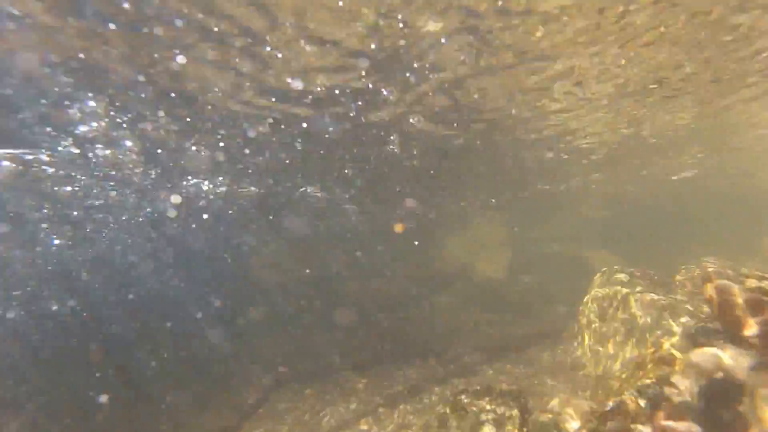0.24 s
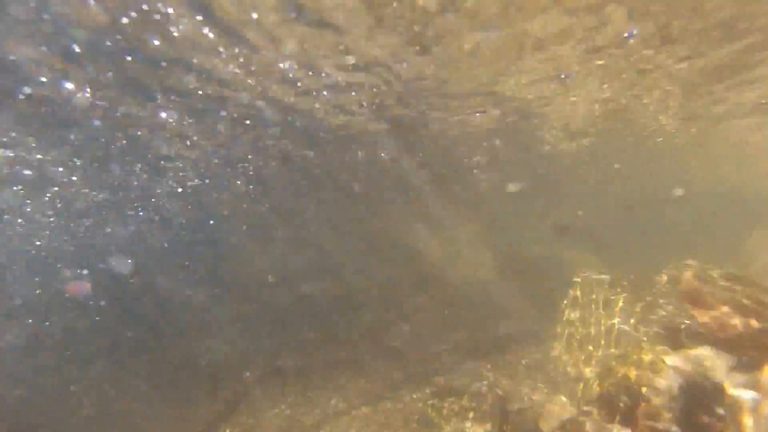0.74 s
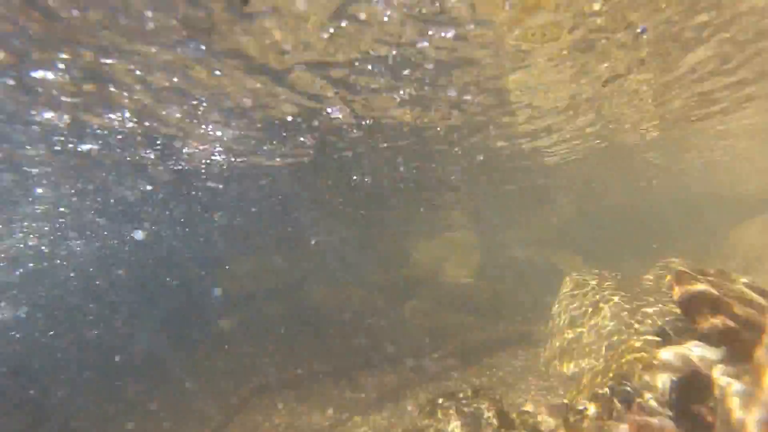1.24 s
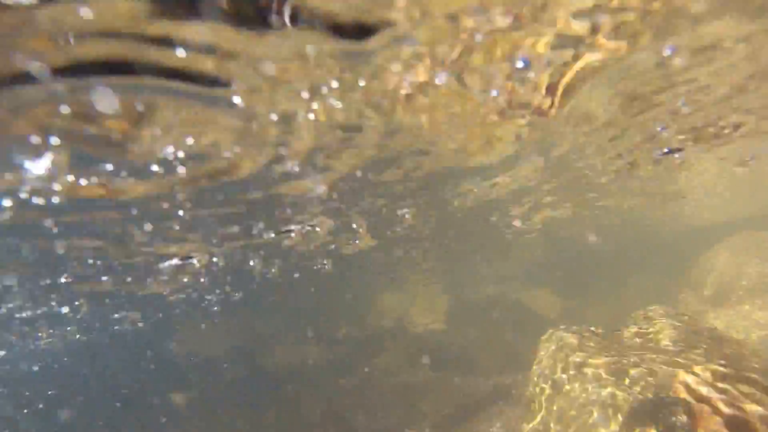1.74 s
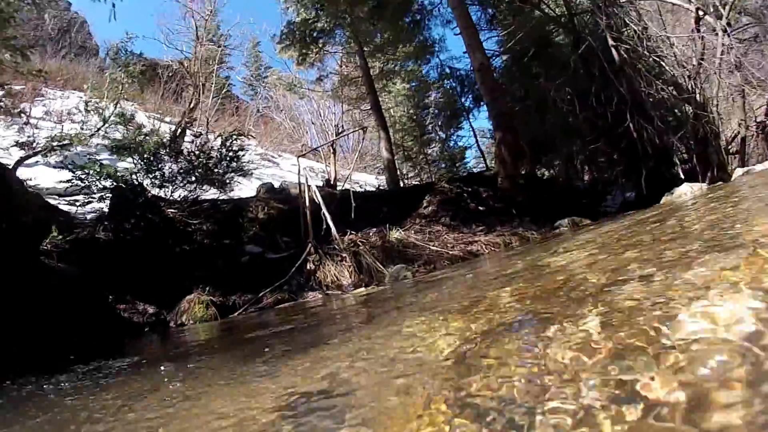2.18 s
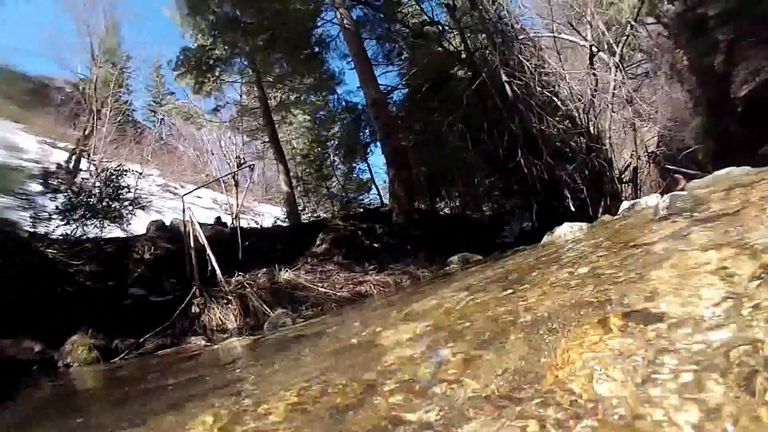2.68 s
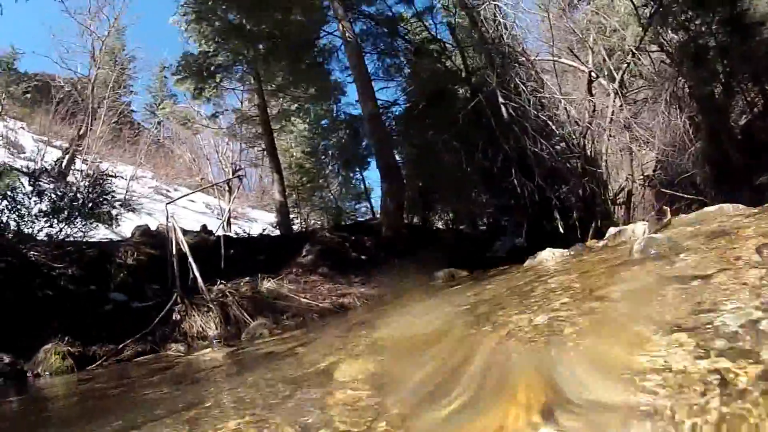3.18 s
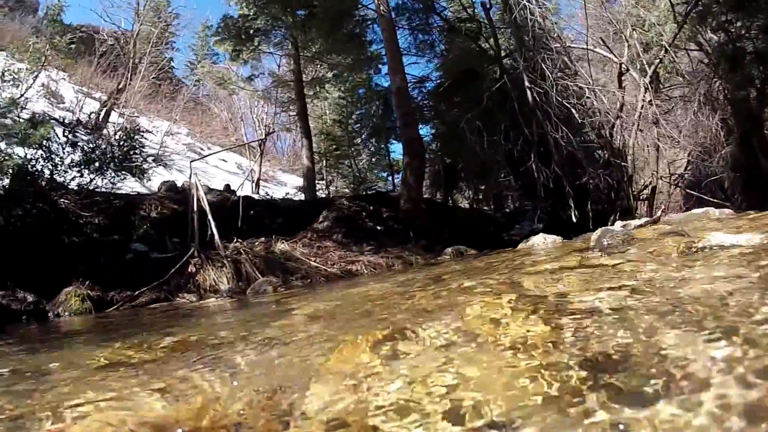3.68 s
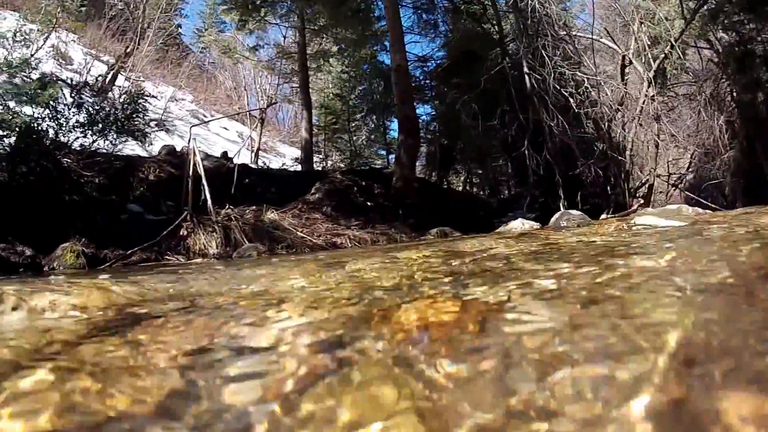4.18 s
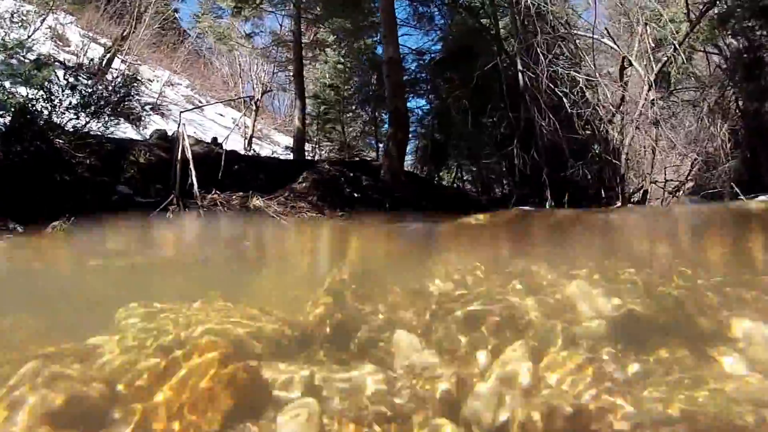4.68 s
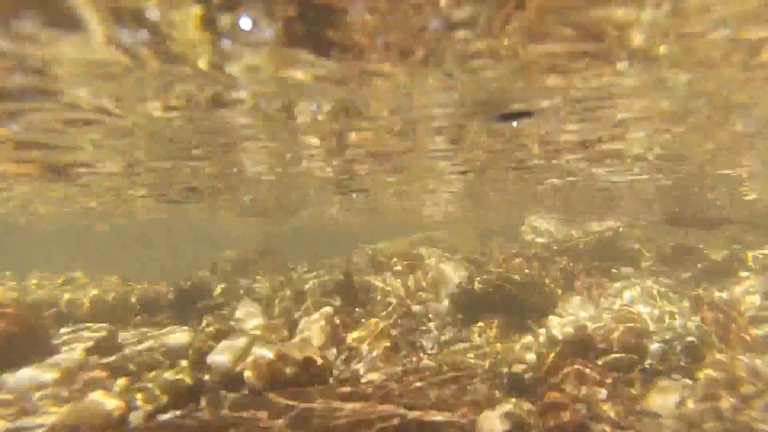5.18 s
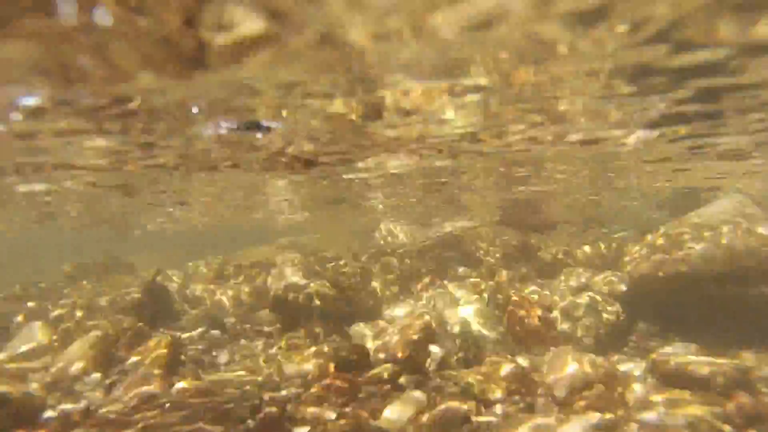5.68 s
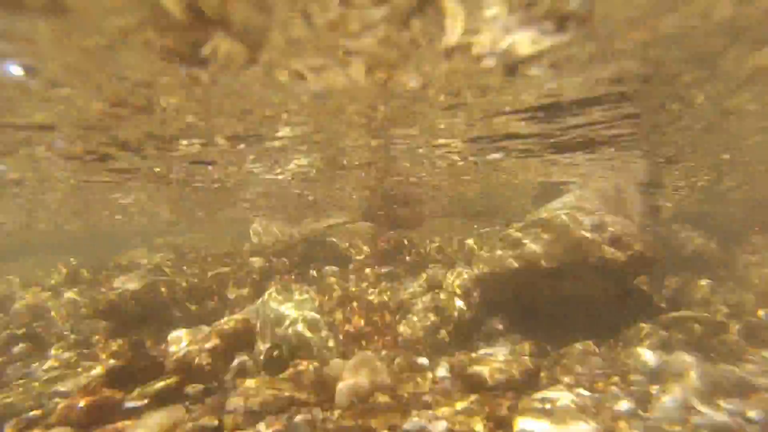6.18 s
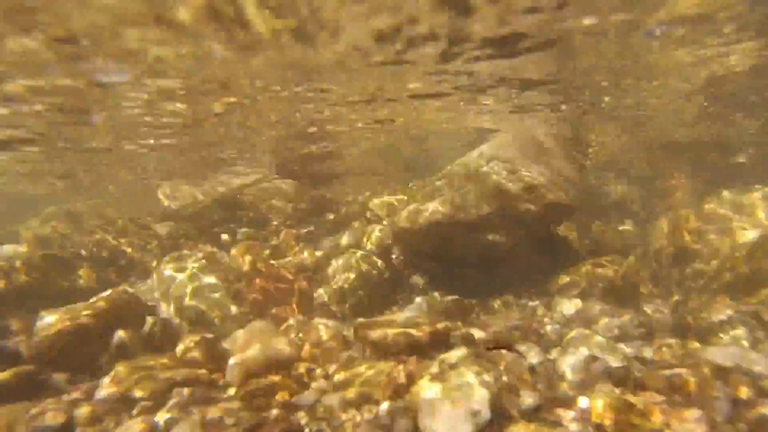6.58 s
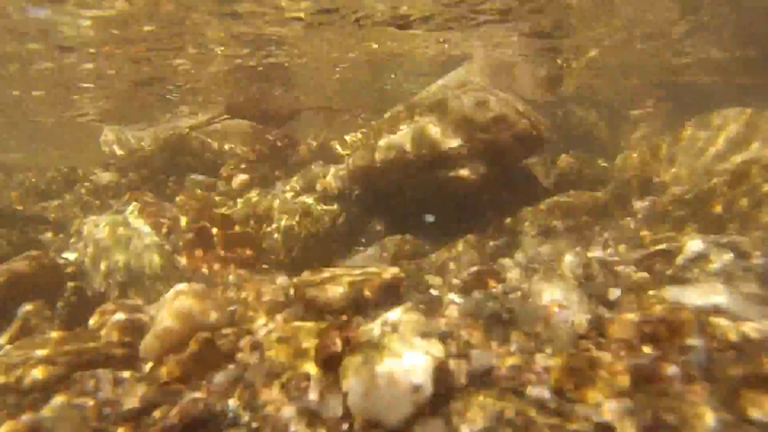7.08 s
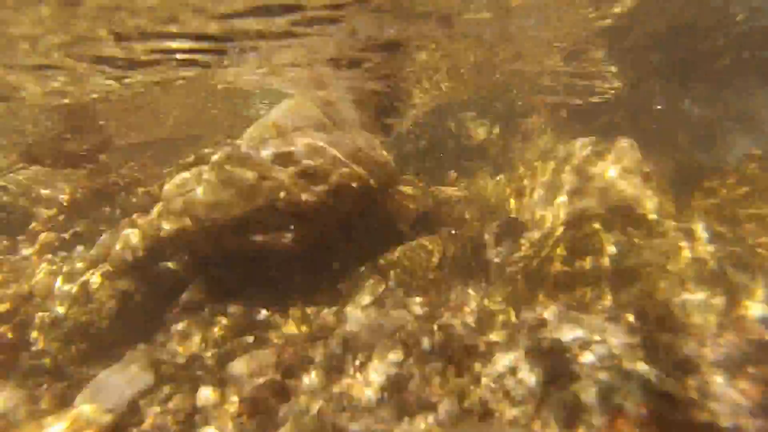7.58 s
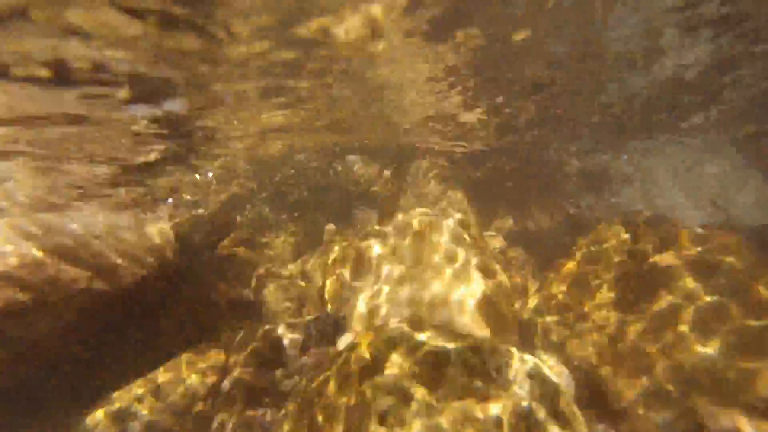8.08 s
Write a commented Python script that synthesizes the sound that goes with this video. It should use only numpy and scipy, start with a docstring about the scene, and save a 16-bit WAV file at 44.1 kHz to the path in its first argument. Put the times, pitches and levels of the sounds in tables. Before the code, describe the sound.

The microphone sits inside a watertight camera housing in a shallow stony stream, so everything is close, boxy and central. From 0 to 1.3 s there is muffled low rumble and gurgle, with soft knocks, a slightly stronger bump near 0.5 and faint gravel scrapes. Around 2 s the case surfaces and the babble turns thinner and brighter over faint hiss. At 2.94 a violent, distorted crack with hollow ringing and aftershocks ducks the background briefly. A sharp water slap comes at 3.8, with drips and tiny ticks until 4.5 as the case sinks and the water dulls. Hard knocks strike at 5.5 and rapidly from 5.7 to 5.8. From 6.3 to 7.2 it grinds and judders through gravel with irregular clacks, the loudest near 6.8. After a last small tick around 7.5, only muffled wash and low rumble continue to about 8.4.

```python
"""A watertight housing with a microphone inside knocks on stones and drags through gravel in a shallow stream.
Blows ring its walls and hollow body as damped modes; drags, pebbles and sand are random contacts.
Water slaps, drops, bubbles and sand grains ring briefly; the housing is largely out of the water from 2 to 4.6 s.
The stream is coloured noise and bubble tones over a rumble: muffled under water, brighter in the air.
A limiter ducks after the hardest knocks, which still clip."""
import sys
import numpy as np
from scipy import signal
from scipy.fft import rfft, irfft, next_fast_len
from scipy.io import wavfile
from scipy.ndimage import uniform_filter1d, map_coordinates

SR = 44100
rng = np.random.default_rng(int(sys.argv[2]) if len(sys.argv) > 2 else 0)


def int16_out(signal):
    """Quantize to a 16-bit WAV file."""
    q = np.round(np.clip(np.atleast_2d(signal).T, -1, 1) * 32767)
    wavfile.write(sys.argv[1], SR, q.astype(np.int16))


N = 368101


def amp(db):
    """Gain of a level in dB."""
    return 10 ** (np.asarray(db) / 20)


def unit(x):
    """x at rms 1."""
    return x / np.sqrt(np.mean(x ** 2) + 1e-20)


def curves(rows):
    """One value per sample for each column after the time."""
    time_s, *columns = np.transpose(rows)
    return [np.interp(np.arange(N) / SR, time_s, column) for column in columns]


def wobble(rate_hz):
    """A smooth random curve with rate_hz knots a second."""
    knots = rng.standard_normal(int(N * rate_hz / SR) + 4)
    return map_coordinates(knots, [np.arange(N) * rate_hz / SR])


def filtered(x, response):
    """x times a response of frequency."""
    size = next_fast_len(N + SR // 2)
    spectrum = rfft(x, size) * response(np.fft.rfftfreq(size, 1 / SR))
    return irfft(spectrum, size)[..., :N]


def coloured(x, spectrum):
    """x with the colour of (Hz, dB) points, at rms 1."""
    f_hz, db = np.transpose(spectrum)
    return unit(filtered(x, lambda hz: amp(np.interp(np.log(hz + 1), np.log(f_hz), db))))


def noise(spectrum):
    """Coloured noise of rms 1."""
    return coloured(rng.standard_normal(N), spectrum)


def ring(t, hz, t60, rise):
    """A damped vibration: builds up over rise seconds, falls 60 dB in t60 seconds."""
    decay = 1000 ** (-t / t60)
    return np.sin(2 * np.pi * hz * t) * decay * (1 - np.exp(-(t / rise) ** 2))


def add(track, s, sound):
    """Mix a sound into a track at s seconds."""
    start = max(round(s * SR), 0)
    track[start:start + len(sound)] += sound[:N - start]


def bell(hz, centre_hz, octaves):
    """Weight that falls off with the distance in pitch from a centre."""
    return 1 / (1 + (np.log2(hz / centre_hz) / octaves) ** 2)


def patchy(x, depth_db):
    """x with its colour shifting at random from moment to moment, at rms 1."""
    z = signal.stft(x, nperseg=512)[2]
    field = uniform_filter1d(rng.standard_normal(z.shape), size=7, axis=0)
    field = uniform_filter1d(field, size=3, axis=1)
    return unit(signal.istft(z * amp(depth_db * unit(field)), nperseg=512)[1][:N])


# Knocks against stones. Each row: start in seconds, relative level in dB, nominal ring in Hz,
# thud in dB relative to the blow.
KNOCKS = [(.036, -19.5, 1180, 0), (.057, -20.5, 1490, -0.5), (.144, -36, 1160, -3), (0.218, -37.5, 1420, 3),
          (0.275, -36.5, 1300, 8.5), (.398, -39.5, 1460, 8.5), (0.5423, -21, 1100, -6.5),
          (.871, -31, 1150, 6.5), (0.982, -30.5, 1190, -1), (1.077, -27.5, 1220, -1),
          (1.218, -25.5, 1300, 1), (2.9428, 21.5, 1553, -18), (2.962, 7, 1433, -15.5),
          (2.972, -5, 1400, -11.5), (2.988, -9, 1460, -11.5), (3.024, 3.5, 1470, -21),
          (3.0385, 3.5, 1410, -15.5), (4.033, -26, 1130, -2), (5.477, 7.5, 1092, -7.5),
          (5.515, -14.5, 794, 9.5), (5.694, 8.5, 967, -11), (5.736, -9.5, 756, -7), (5.767, 12, 945, -19.5),
          (5.7968, -2.5, 980, -17.5), (5.8095, 5, 883, -16), (6.308, -1, 1145, -8), (6.325, -4, 1270, -5),
          (6.33, -0.5, 936, -1), (6.3943, -14, 1310, -5), (6.408, -15.5, 1430, 0), (6.597, -5, 1470, -12),
          (6.683, -10, 920, 5), (6.705, -5.5, 1830, -5.5), (6.778, 11, 904, -21.5), (6.7962, -5, 1800, -6),
          (6.878, 5.5, 1145, -26.5), (6.906, -4.5, 1080, -17.5), (6.938, 1, 1020, -18.5),
          (7.126, -19, 675, 7.5), (7.165, -6.5, 950, -24), (7.172, -10, 980, -18.5), (7.197, -4, 970, -5),
          (7.282, -20, 1034, -2.5), (7.48, -28.5, 1190, -15.5)]
# Wall modes. Each row: nominal frequency in Hz, mean level in dB, t60 in seconds.
WALL_MODES = [(713.4, -9, 0.028), (875, -9.5, 0.018), (1108, -12, 0.019), (1617, -10.5, 0.023),
              (1882, -6.5, 0.018), (2337, -8.5, 0.011), (2490, -20, 0.0071), (3220, -20, 0.031),
              (3850, -26.5, 0.028)]
# Hollow-body modes. Each row: nominal frequency in Hz, mean level in dB, t60 in seconds.
BODY_MODES = [(159.5, -7.5, 0.085), (242.8, -6, 0.085), (408.3, -5, 0.026), (555, -9, 0.026)]
# Crunch and splash spectrum. Each row: frequency in Hz, density in dB per Hz.
CRUNCH_SPECTRUM = [(150, -2), (450, -6.5), (700, -3), (900, -3.5), (1800, 3.5), (2400, -10), (3500, -33),
                   (4400, -44), (9000, -56), (16000, -74.5)]
BODY_DB, BODY_DB_PER_THUD_DB = -7, 0.49  # body re the blow; a heavier shove wakes more of it


def wall_ring(t, hit_hz):
    """Wall modes answer a blow, most strongly near its pitch."""
    out = np.zeros(len(t))
    for mode_hz, db, t60_s in WALL_MODES:
        gain = amp(db + rng.normal(0, 3)) * bell(mode_hz, hit_hz, octaves=.7) * rng.choice([-1, 1])
        out += gain * ring(t, mode_hz * rng.normal(1, 0.02), t60_s, rise=0.00064)
    return out


def body_ring(t):
    """The hollow body sounds its low modes, each at a slightly random level and pitch."""
    out = np.zeros(len(t))
    for mode_hz, db, t60_s in BODY_MODES:
        gain = amp(db + rng.normal(0, 3.8))
        out += gain * ring(t, mode_hz * rng.normal(1, 0.011), t60_s, rise=0.0011)
    return out


def shove(t):
    """The blow moves the housing: a quick thump and a slower swing."""
    sway = rng.uniform(.8, 1.25)
    thump = ring(t, 56 * sway, t60=0.047, rise=0.0015)
    swing = ring(t, 22 * sway, t60=.22, rise=.008)
    return thump + amp(-10) * swing


def knocks(blows):
    """Each blow rings at the pitch of the spot hit, wakes walls and body, and shoves the housing."""
    out, crush, t = np.zeros(N), np.zeros(N), np.arange(SR // 6) / SR
    for s, db, hz, thud_db in blows:
        spot = ring(t, hz * rng.normal(1, 0.022), t60=0.0099, rise=.0007)
        walls = wall_ring(t, hz)
        body = amp(BODY_DB + BODY_DB_PER_THUD_DB * thud_db) * body_ring(t)
        thud = amp(thud_db + 1) * shove(t)
        # the hardest blows ring shorter
        shortening = amp(-.4 * max(db, 0) * np.clip(t / 0.0081, 0, 1.3) ** 2)
        blow = shortening * (spot + walls) + np.sqrt(shortening) * body - thud
        add(out, s - .0004, amp(db + 3.0) * blow)
        crush_onset = 1 - np.exp(-(t / 0.00037) ** 2)
        crush_decay = amp(-60 * t / 0.027) + 0.073 * amp(-60 * t / 0.065)
        add(crush, s, amp(db - 13.5) * shortening * crush_onset * crush_decay)
    # sand caught in the contact crunches
    return out + crush * noise(CRUNCH_SPECTRUM)


DRAG_ATTACK_S, DRAG_RELEASE_S = 0.0083, 0.012  # time constants


def grip(start, end):
    """Envelope of a sliding contact: it bites, holds and lets go."""
    t = np.arange(N) / SR
    before, after = np.maximum(start - t, 0), np.maximum(t - end, 0)
    return np.exp(-before / DRAG_ATTACK_S - after / DRAG_RELEASE_S)


# Drags over gravel. Each row: start in seconds, end in seconds, relative scrape in dB, relative judder in dB.
DRAGS = [(.005, 0.248, -52, -36), (0.027, 0.097, -37.5, -27), (0.752, 1.237, -54, -45.5),
         (0.848, 1.088, -47, -32), (1.196, 1.227, -44.5, -39), (2.959, 3.021, -37.5, -30),
         (5.778, 5.801, -38, -20.5), (6.281, 7.152, -46, -33.5), (6.325, 6.328, -22.5, -6),
         (6.449, 6.732, -38, -22.5), (6.796, 6.868, -28, -18), (6.589, 6.733, -29, -24),
         (6.931, 6.975, -26.5, -25.5), (7.2, 7.215, -41, -20.5)]
SKID_DB, SKID_T60_S = -25.5, .085  # level re the blow, decay
SKID_JUDDER_DB, SKID_LIMIT_DB = 9, -9.5  # judder re the skid's scrape; blow above which a skid grows no more


def pressure():
    """Strength of scrape and judder: the strongest drag rules, and every listed knock starts a skid."""
    t = np.arange(SR // 4) / SR
    scrape, judder, skid = np.zeros((3, N))
    for start, end, scrape_db, judder_db in DRAGS:
        contact = grip(start, end)
        scrape = np.maximum(scrape, amp(scrape_db) * contact)
        judder = np.maximum(judder, amp(judder_db) * contact)
    for s, db, _, _ in KNOCKS:
        add(skid, s, amp(min(db, SKID_LIMIT_DB) + SKID_DB - 60 * t / SKID_T60_S))
    return np.hypot(scrape, skid), np.hypot(judder, amp(SKID_JUDDER_DB) * skid)


def grains(rate_hz, spread_db):
    """Tiny random contacts of very unequal size."""
    hit = rng.random(N) < rate_hz / SR
    return hit * rng.standard_normal(N) * amp(spread_db * rng.standard_normal(N))


# Spectra of wall rasp, body judder and sand grit. Each row: frequency in Hz, density in dB per Hz.
SCRAPE_SPECTRUM = [(200, -9.5), (380, -3), (470, -7.5), (600, 4.5), (780, -0.5), (930, 7.5), (1300, -5.5),
                   (1650, 1), (2100, -7), (2750, -21), (3500, -23), (4300, -35.5), (8000, -60.5),
                   (16000, -86)]
JUDDER_SPECTRUM = [(12, -8), (27, 9), (45, 1.5), (75, 1.5), (125, -7.5), (200, -5.5), (260, -5),
                   (330, -27.5), (600, -39), (2500, -100)]
GRIT_SPECTRUM = [(1500, -9), (3400, 12), (4600, 1.5), (5400, 1), (6200, -6), (7200, -2), (8300, -15.5),
                 (9300, -12), (12000, -20), (15500, -33)]
# Sand scuffing the wall. Each row: start in seconds, end in seconds, relative level in dB.
SCUFFS = [(6.326, 6.33, -44.5), (6.597, 6.721, -44.5), (6.93, 6.968, -55.5), (7.195, 7.213, -48.5)]


def gravel(scrape, judder):
    """The housing sticks and slips over gravel: its walls rasp and its whole body judders."""
    slip = amp(3.6 * wobble(100) + 1.7 * wobble(22))
    # shifting colour: passing stones wake other wall resonances
    rasp = patchy(coloured(grains(rate_hz=2000, spread_db=1.0), SCRAPE_SPECTRUM), depth_db=2.5)
    shake = coloured(grains(rate_hz=1900, spread_db=0.5), JUDDER_SPECTRUM)
    scuffs = sum(amp(db - 1) * grip(start, end) for start, end, db in SCUFFS)
    sand = amp(3.7 * wobble(40)) * scuffs
    grit = patchy(coloured(grains(rate_hz=13000, spread_db=6), GRIT_SPECTRUM), depth_db=4.0)
    return slip * (scrape * rasp + judder * shake + (sand + amp(-45) * scrape) * grit)


PEBBLE_TRIES_PER_S = 20  # only those that fall while sliding sound
PEBBLE_DB, PEBBLE_SPREAD_DB = 13, 2  # mean re the scrape, spread
PEBBLE_HZ, PEBBLE_THUD_DB = 1296, -6.5  # typical ring; thud re the blow


def pebbles(scrape):
    """Small random knocks while the housing slides, their level following the scrape: rows as in KNOCKS."""
    when = rng.integers(N, size=int(PEBBLE_TRIES_PER_S * N / SR))
    sliding = when[scrape[when] > amp(-56)]
    blows = []
    for i in sliding:
        size, spot = rng.standard_normal(2)
        db = 20 * np.log10(scrape[i]) + PEBBLE_DB + PEBBLE_SPREAD_DB * size
        blows.append((i / SR, db, PEBBLE_HZ * np.exp(0.17 * spot), PEBBLE_THUD_DB))
    return blows


# Water slaps, drops and bubbles on the housing. Each row: start in seconds, relative level in dB,
# pitch in Hz, t60 in seconds.
PLOPS = [(2.136, -38, 1470, .027), (2.402, -34.5, 2700, 0.01), (2.989, -20.5, 291, 0.076),
         (3.04, -14.5, 293, 0.085), (3.7797, 1.5, 1554, 0.011), (3.855, -16.5, 1260, 0.022),
         (3.887, -6.5, 2520, 0.0066), (3.945, -26, 1470, 0.016), (4.017, -20.5, 1280, 0.018),
         (4.034, -16, 1200, .014), (4.037, -34, 790, 0.057), (4.545, -37.5, 258, 0.06),
         (5.036, -23.5, 1890, 0.0092), (5.0535, -27.5, 970, 0.034), (5.0533, -31.5, 2760, .011),
         (6.568, -11.5, 1005, 0.026)]


def plops():
    """Water slaps, drops and bubbles ring briefly, each nearly as a pure tone, over a small splash."""
    out, splash, t = np.zeros(N), np.zeros(N), np.arange(SR // 10) / SR
    for s, db, hz, t60_s in PLOPS:
        add(out, s, amp(db + 3.5) * ring(t, hz, t60_s, rise=0.00048))
        add(splash, s, amp(db - 18.5) * (1 - np.exp(-t / 0.00033)) * amp(-60 * t / 0.04))
    return out + splash * noise(CRUNCH_SPECTRUM)


# Drops and sand grains on the case. Each row: start in seconds, relative level in dB, pitch in Hz.
TICKS = [(2.401, -47.5, 5130), (3.751, -31, 5490), (3.779, -25.5, 5400), (3.873, -25.5, 2380),
         (3.886, -20.5, 3600), (3.945, -39, 7750), (3.952, -28.5, 8400), (3.983, -28.5, 2180),
         (4.234, -42.5, 3670), (4.368, -42.5, 6860), (4.387, -35, 1850), (4.482, -34.5, 5245),
         (7.1, -33, 3266), (7.48, -36, 3350), (7.536, -34.5, 2190)]


def ticks():
    """A drop or sand grain gives a tiny noise crack and a short high ping."""
    out, t = np.zeros(N), np.arange(SR // 30) / SR
    for s, db, hz in TICKS:
        grain = signal.lfilter([.4], [1, -.55], rng.standard_normal(len(t)))
        crack = .5 * grain * amp(-60 * t / 0.0086)
        ping = ring(t, hz, t60=0.007, rise=0.000074)
        add(out, s + 0.00023, amp(db + 1.0) * (ping + crack))
    return out


def bubbling(spectrum, rate_hz, cycles, spread_db, share):
    """Many short rising bubble tones on a bed of noise; share is the bubbles' part of the power."""
    when, pitch, size = rng.random((int(rate_hz * N / SR), 3)).T[:, :, None]
    t = np.arange(SR // 50) / SR
    hz = 300 * 16 ** pitch
    gain = amp(-spread_db * np.log(size + .01)) * np.sqrt(hz)
    tones = gain * ring(t, hz * (1 + 6 * t), cycles / hz, .5 / hz)
    at = (when * N).astype(int) + np.arange(len(t))
    bubbles = coloured(np.bincount(at.ravel(), tones.ravel(), N)[:N], spectrum)
    share = np.clip(share, 0, 1)
    return np.sqrt(share) * bubbles + np.sqrt(1 - share) * noise(spectrum)


# The stream around the housing. Each row: time in seconds, relative rumble of the current in dB,
# relative wash in dB, babble heard under water in dB.
STREAM = [(0, -42, -59.5, -62.5), (1.3, -44.5, -60.5, -71), (1.8, -39.5, -60, -67.5),
          (2.5, -44, -62.5, -74), (3.2, -35, -62.5, -67.5), (4.8, -41.5, -58.5, -60.5),
          (6.1, -39.5, -57, -62), (7.4, -41, -55.5, -60.5), (8.1, -42.5, -52.5, -61)]
# Each row: time in seconds, share of the housing out of the water 0-1.
IN_AIR = [(1.75, 0), (1.94, 0.37), (2.12, 0.92), (4.1, 0.89), (4.35, 0.65), (4.7, 0.23), (5.0, 0.06)]
# Stream spectra. Each row: frequency in Hz, density in dB per Hz.
RUMBLE_SPECTRUM = [(12, -5), (25, 2), (45, -3), (65, -13.5), (100, -24), (200, -45.5), (800, -100)]
WASH_SPECTRUM = [(60, -14), (110, 7.5), (160, 5.5), (250, 6), (310, -3), (400, -2), (520, -4), (740, -0.5),
                 (860, -12), (1500, -30), (6000, -83.5)]
BABBLE_UNDER_SPECTRUM = [(400, -21.5), (750, 1), (1000, 0), (1400, -3.5), (1900, -3), (2350, -8.5),
                         (2800, -8), (3150, -14.5), (3600, -11), (4200, -27), (9000, -41.5)]
BABBLE_AIR_SPECTRUM = [(300, -18.5), (900, -13.5), (1200, -8), (1530, 0), (1900, -8), (2400, -12.5),
                       (3100, -19), (3700, -16.5), (4400, -27), (5500, -24.5), (7000, -34), (14000, -50.5)]
OPEN_AIR_DB, WASH_LOSS_DB, WATERLINE_DB = -52, 2.5, -49.5  # babble and wash loss if fully out; singing


def stream():
    """The current shakes the housing; the babble is dull under water and brighter in the air."""
    rumble_db, wash_db, babble_db = curves(STREAM)
    air = np.clip(curves(IN_AIR)[0], 0, 1)
    rumble = amp(rumble_db + 2) * noise(RUMBLE_SPECTRUM)
    wash = bubbling(WASH_SPECTRUM, rate_hz=270, cycles=18, spread_db=3.5, share=0.26)
    wash *= amp(wash_db + 3 - WASH_LOSS_DB * air + 2.4 * wobble(4.9))
    under = bubbling(BABBLE_UNDER_SPECTRUM, rate_hz=340, cycles=16, spread_db=4.5, share=0.16)
    under *= amp(babble_db) * np.sqrt(1 - air)
    above = bubbling(BABBLE_AIR_SPECTRUM, rate_hz=700, cycles=18, spread_db=4.5, share=0.19)
    above *= amp(OPEN_AIR_DB) * air
    # while it sinks, most when half submerged, the housing sings in a higher resonance
    sinking = np.gradient(air) < 0
    singing = unit(filtered(rng.standard_normal(N), lambda hz: bell(hz, centre_hz=2110, octaves=0.13)))
    waterline = amp(WATERLINE_DB) * sinking * air * (1 - air) * singing
    return rumble + wash + amp(0.68 * wobble(11)) * (under + above + waterline)


# Steady hiss. Each row: frequency in Hz, density in dB per Hz.
HISS_SPECTRUM = [(100, 0), (1500, -0.5), (4000, 5), (8000, 2.5), (14500, -2.5), (15600, -14.5)]


def hiss(db):
    """Steady coloured noise at an rms level in dB."""
    return amp(db) * noise(HISS_SPECTRUM)


def scene():
    """Everything reaches the microphone through the one housing, so it is all in the middle."""
    scrape, judder = pressure()
    contacts = knocks(KNOCKS) + knocks(pebbles(scrape)) + gravel(scrape, judder)
    inside = contacts + plops() + ticks() + stream() + hiss(-70.5)
    # the two channels differ only faintly: a quarter-cycle shifted copy and hiss
    side = filtered(inside, lambda hz: 1j * amp(-43.5) * (1 + np.minimum(hz, 3000) / 3000))
    side = side + hiss(-77)
    return np.array([inside + side, inside - side])


LIMIT_DB, MOST_CUT_DB = -3, 9.5  # threshold, deepest cut
LIMIT_ATTACK_S, RECOVER_DB_PER_S = 0.0069, 88  # smoothing time constant, release
TOP_HZ = 16200  # band limit


def record(dry):
    """A limiter ducks after hard knocks, too late to keep them from clipping; a steep low-pass follows."""
    level_db = 20 * np.log10(np.abs(dry).max(axis=0) + 1e-9)
    over_db = np.clip(level_db - LIMIT_DB, 0, MOST_CUT_DB)
    recovery = RECOVER_DB_PER_S * np.arange(N) / SR
    held_db = np.maximum.accumulate(over_db + recovery) - recovery
    keep = np.exp(-1 / (LIMIT_ATTACK_S * SR))
    cut_db = signal.lfilter([1 - keep], [1, -keep], held_db)
    clipped = np.clip(dry * amp(-cut_db), -.96, .96)
    return filtered(clipped, lambda hz: 1 / (1 + (hz / TOP_HZ) ** 80))


dry = scene()
out = record(dry)
int16_out(out)
```